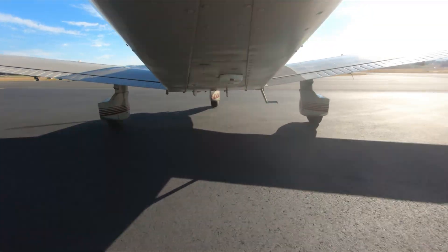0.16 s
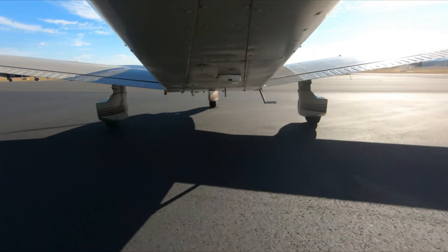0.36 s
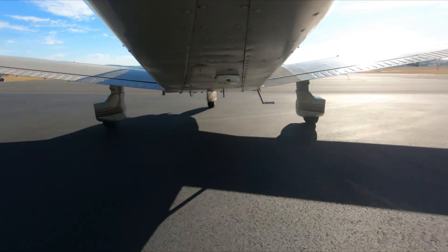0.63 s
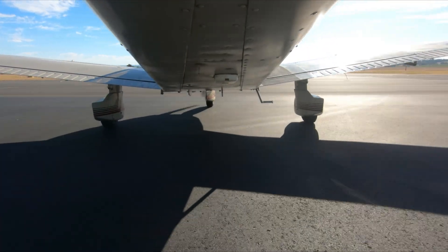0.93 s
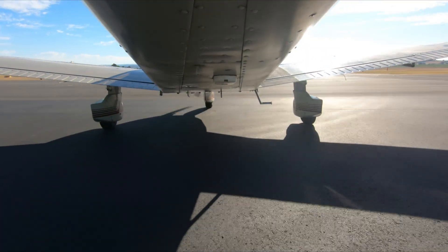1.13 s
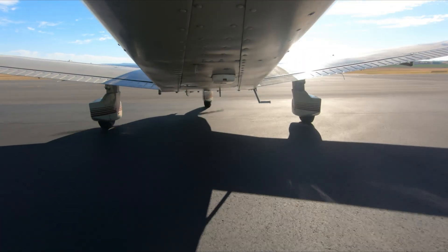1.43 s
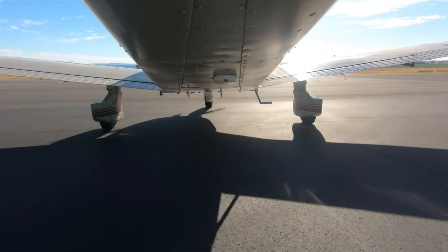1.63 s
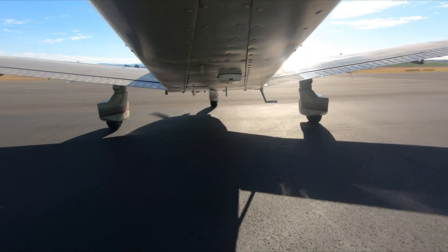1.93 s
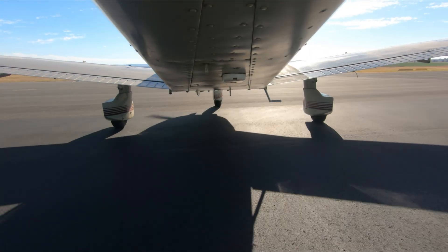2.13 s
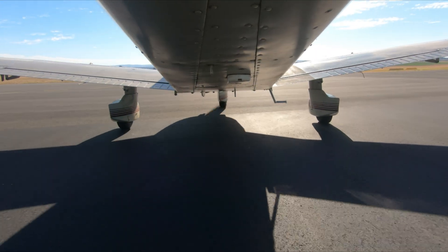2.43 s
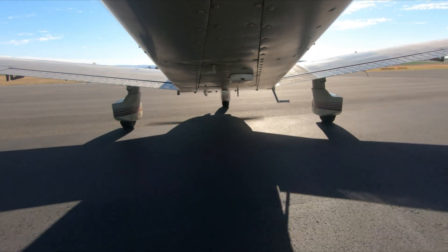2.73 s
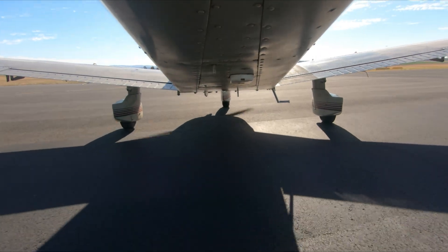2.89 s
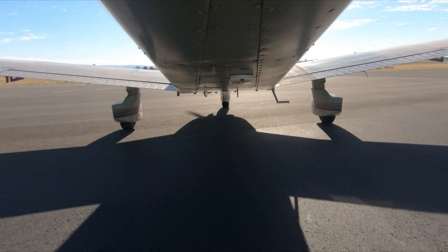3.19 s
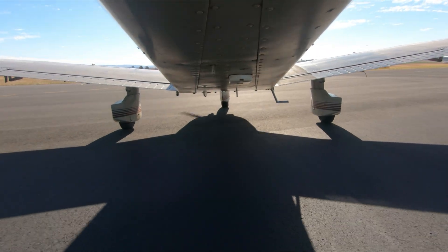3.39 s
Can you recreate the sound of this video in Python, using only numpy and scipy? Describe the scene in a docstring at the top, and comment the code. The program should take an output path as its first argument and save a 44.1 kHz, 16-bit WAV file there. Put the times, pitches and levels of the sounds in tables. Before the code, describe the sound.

A light propeller plane taxis with a low, fluttering engine drone, rumbling wash and faint hiss.

```python
"""A light aircraft taxis at low power, heard by a close pair of microphones under its tail.
From the start a four-cylinder engine and two-blade propeller drone: tones locked to the crankshaft,
a rasping noise puff per firing, valve ticks, a ring repeated each cycle, rumbling and hissing wash, thin whines.
Short noise bursts spit from the exhaust now and then; from the first second on, narrow hollow swells join them.
Exhaust, ring, shake and low wash grow while the firing tone weakens late; a limiter restrains the bass."""
import sys
import numpy as np
from scipy import signal
from scipy.fft import rfft, irfft
from scipy.io import wavfile
from scipy.ndimage import uniform_filter1d, minimum_filter1d

SR = 44100
rng = np.random.default_rng(int(sys.argv[2]) if len(sys.argv) > 2 else 0)


def to_wav(sig):
    """Store sig (one row per channel, or 1-D mono) as 16-bit WAV at the path in sys.argv[1].

    Samples outside -1..1 are clipped; the rate is SR.
    """
    pcm = np.clip(np.atleast_2d(sig), -1, 1) * 32767
    pcm = np.round(pcm).astype(np.int16)
    wavfile.write(sys.argv[1], SR, pcm.T)  # frames by channels


N = 156555

# Spectrum shape of the exhaust gas. Each row: frequency in Hz, relative density in dB per Hz.
EXHAUST_SPECTRUM = [(200, -28), (600, -4.5), (950, 3), (1350, 2.5), (1650, -2.5), (1900, -6.5), (2200, -17),
                    (3000, -18.5), (5000, -28.5), (7500, -29), (10000, -34.5), (15000, -59)]

START_TURN, JITTER_TURNS = -.22, 0.0032  # crankshaft position at the start, and its unsteadiness
DRONE_LAG_TURNS, SHAKE_LAG_TURNS = 0.3655, -0.022
WAVER_HZ, WAVER_DB, FIRING_WAVER_DB = 8.6, 0.52, 0.2
UNEVEN_HZ, UNEVEN_DB = 17, 0.94  # shared wavering of the overtones
OCTAVE_TRIM_DB = -0.12
SHAKE_DB, SHAKE_RISE_DB_PER_S, SHAKE_WAVER_DB = -47, 1.2, 1.5
RING_DB, RING_RISE_DB_PER_S = -54, 1.1
RING_TURN, RING_WIDTH_TURNS, RING_FLOOR = 0.29, 0.25, 0.6
RASP_DB, RASP_RISE_DB_PER_S = -52.5, 0.4
PUFF_TURNS, PUFF_SPREAD_DB = 0.12, 0.9
TICK_DB, TICK_TURNS = -72.5, 0.044
WASH_DB, HISS_DB, BUFFET_RISE_DB_PER_S = -42, -60, 0.5
WHINE_SPREAD_DB, WHINE_JITTER_CYCLES, WHINE_JITTER_HZ = 1, .09, 25
SPIT_RISE_S, SPIT_DECAY_S = 0.0011, 0.0073
SWELL_HZ, SWELL_WIDTH_HZ, SWELL_S = 913, 20, 0.044
FADE_S = .004
BASS_HZ, BASS_CEILING_DB, EDGE_HZ = 170, -28, 15700


def amp(db):
    """Decibels to gain."""
    return 10 ** (np.asarray(db) / 20)


def unit(x):
    """Scales to rms 1."""
    return x / np.sqrt(np.mean(x ** 2) + 1e-20)


def read(points, hz):
    """Reads a table on a log-frequency axis."""
    f, value = np.transpose(points)
    return np.interp(np.log(hz + 1), np.log(f + 1), value)


def bins():
    """Frequencies of a whole-length spectrum, in Hz."""
    return np.fft.rfftfreq(N, 1 / SR)


def colour(x, spectrum):
    """Filters by a spectrum shape, then scales to rms 1."""
    return unit(irfft(rfft(x) * amp(read(spectrum, bins())), N))


def bass(x):
    """The part of a sound below about BASS_HZ."""
    return irfft(rfft(x) / (1 + (bins() / BASS_HZ) ** 6), N)


def drift(rate_hz):
    """Random wandering of rms 1, mostly slower than rate_hz."""
    return unit(irfft(rfft(rng.standard_normal(N)) / (1 + (bins() / rate_hz) ** 4), N))


def air():
    """White noise at the two microphones, its likeness between them set at each frequency."""
    # Each row: frequency in Hz, left-right likeness from 0 to 1.
    likeness = [(100, 0.98), (300, 1), (600, 0.88), (1300, 0.95), (1900, 0.95), (2400, 0.96), (4500, 0.76),
                (7000, 0.87), (10000, 0.86), (12500, .5), (15000, 0.98)]
    a, b = rfft(rng.standard_normal((2, N)))
    shared = np.clip(read(likeness, bins()), 0, 1)
    right = shared * a + np.sqrt(1 - shared ** 2) * b
    return irfft(np.array([a, right]), N)


def control(index):
    """One column of the engine's run, interpolated to every sample."""
    # Each row: time in seconds, crankshaft turns per second, level of the firing tone in dB,
    # of its octave in dB before OCTAVE_TRIM_DB, of its double octave in dB.
    engine_run = [(0.0, 27.51, -35.5, -44.0, -53), (0.5, 27.58, -35.0, -42.2, -53),
                  (0.76, 27.55, -35.1, -42.4, -53.5), (1.01, 27.63, -35.7, -42.2, -56),
                  (1.52, 27.62, -35.9, -42.4, -51.5), (1.78, 27.69, -35.9, -43.0, -49.5),
                  (2.3, 27.59, -36.0, -44.4, -51.5), (2.55, 27.59, -36.4, -42.8, -54),
                  (2.79, 27.55, -37.4, -43.0, -52.5), (3.2, 27.59, -39.6, -40.6, -52),
                  (3.55, 27.61, -39.8, -44.0, -53.5)]
    rows = np.array(engine_run)
    return np.interp(np.arange(N) / SR, rows[:, 0], rows[:, index])


def bump(turns, place, width):
    """A smooth swell once in every two-turn engine cycle."""
    distance = (turns - place + 1) % 2 - 1
    return np.exp(-.5 * (distance / width) ** 2)


def drone(turns, from_middle_s):
    """Firings and blade passes push the air in step: firing tone, wavering overtones, growing once-a-turn shake."""
    # Weaker tones. Each row: multiple of the crankshaft rate, level in dB.
    weaker_tones = [(3, -49), (5.5, -62), (6, -62.5), (7, -67), (10, -56), (10.5, -73), (11, -67),
                    (12, -62), (13, -67), (14.5, -68), (16, -70.5)]
    angle = 2 * np.pi * (turns - DRONE_LAG_TURNS)
    firing_level = amp(control(index=2) + FIRING_WAVER_DB * drift(WAVER_HZ))
    firing = firing_level * np.sin(2 * angle)  # two firings a turn

    octaves = [(4, control(index=3) + OCTAVE_TRIM_DB), (8, control(index=4))]
    overtones = np.zeros(N)
    for multiple, db in octaves + list(weaker_tones):
        overtones += amp(db + WAVER_DB * drift(WAVER_HZ)) * np.sin(multiple * angle)
    unevenness = amp(UNEVEN_DB * drift(UNEVEN_HZ))

    shake_db = SHAKE_DB + SHAKE_RISE_DB_PER_S * from_middle_s + SHAKE_WAVER_DB * drift(WAVER_HZ)
    shake = amp(shake_db) * np.cos(2 * np.pi * (turns - SHAKE_LAG_TURNS))
    return np.sqrt(2) * (firing + unevenness * overtones + shake)  # levels are rms


def ring(turns, from_middle_s, count=180):
    """Pipe and airframe answer every cycle alike: harmonics of the cycle, strongest at one place in it."""
    # Each row: frequency in Hz, relative density in dB per Hz.
    ring_spectrum = [(100, -11), (170, -31), (330, 1.5), (600, 4.5), (950, -4), (1300, -2.5), (2000, -18),
                     (4000, -41)]
    phases = rng.random(count)
    pattern = np.zeros(N)
    for k, phase in enumerate(phases, 1):
        pattern += np.cos(np.pi * k * turns + 2 * np.pi * phase)
    strength = RING_FLOOR + bump(turns, RING_TURN, RING_WIDTH_TURNS)
    level = amp(RING_DB + RING_RISE_DB_PER_S * from_middle_s)
    return level * colour(pattern * strength, ring_spectrum)


def rasp(turns, from_middle_s):
    """Each cylinder lets out a puff of turbulent gas, its strength varying by chance from cycle to cycle."""
    # Each row: place in the two-turn cycle in turns, relative strength in dB.
    cylinders = [(.41, -3.5), (.90, 0), (1.40, -1.5), (1.92, -0.2)]
    gate = np.zeros(N)
    for place, db in cylinders:
        cycle = ((turns - place + 1) // 2).astype(int) + 2
        chance = rng.standard_normal(size=128)[cycle]
        gate += amp(db + PUFF_SPREAD_DB * chance) * bump(turns, place, PUFF_TURNS)
    level = amp(RASP_DB + RASP_RISE_DB_PER_S * from_middle_s)
    return level * colour(air() * gate, EXHAUST_SPECTRUM)


def valve_ticks(turns):
    """The valve gear ticks at the same places in every cycle, as short puffs of bright noise."""
    # Each row: place in the two-turn cycle in turns, relative strength in dB.
    tick_places = [(.15, 1), (.32, -0.5), (.64, 3), (.82, -1.5), (1.32, -2), (1.60, -4), (1.84, 4)]
    # Each row: frequency in Hz, relative density in dB per Hz.
    tick_spectrum = [(1000, -17), (2800, 1), (4500, -2.5), (7400, -5), (10000, -10), (12200, -16),
                     (15000, -28)]
    gate = sum(amp(db) * bump(turns, place, TICK_TURNS) for place, db in tick_places)
    return amp(TICK_DB) * colour(air() * gate, tick_spectrum)


def wash(from_middle_s, gust_db=0.9, flutter_db=1.0, swell_db=0.8):
    """Propeller wash rumbles along the belly in gusts, its bass growing, with a fluttering hiss."""
    # Each row of both: frequency in Hz, relative density in dB per Hz.
    rumble_spectrum = [(10, -5), (25, 4), (40, 2.5), (70, -3), (100, 2), (130, -1.5), (170, -6), (240, -11),
                       (330, -12), (450, -15.5), (750, -15), (950, -13.5), (1200, -21.5), (1700, -20.5),
                       (2300, -37.5), (5000, -69)]
    hiss_spectrum = [(500, 9), (1500, 2.5), (2300, 2), (2800, 1.5), (3400, -2), (4500, -3.5), (6300, -7.5),
                     (7400, -5), (9400, -12.5), (10200, -18), (12200, -17), (13500, -25), (15500, -33)]
    gusts = amp(gust_db * drift(rate_hz=7.7))
    rumble = amp(WASH_DB) * colour(air() * gusts, rumble_spectrum)
    buffet = amp(BUFFET_RISE_DB_PER_S * from_middle_s)
    rumble = rumble + bass(rumble) * (buffet - 1)  # only the bass grows
    flutter = amp(flutter_db * drift(rate_hz=180) + swell_db * drift(rate_hz=3.4))
    return rumble + amp(HISS_DB) * colour(air() * flutter, hiss_spectrum)


def whines():
    """Thin high sine tones with a slight quiver in pitch and level."""
    # Each row: centre frequency in Hz, peak level in dB, width of the wander in Hz.
    whine_tones = [(2654, -75.5, 2), (3779, -82.5, 2), (5285, -90, 30), (13295, -97.5, 40),
                   (14190, -99.5, 40), (15087, -105.5, 40)]
    out = np.zeros(N)
    for hz, db, width in whine_tones:
        cycles = np.cumsum(hz + width / 2 * drift(width)) / SR
        cycles += WHINE_JITTER_CYCLES * drift(WHINE_JITTER_HZ)
        out += amp(db + WHINE_SPREAD_DB * drift(width)) * np.sin(2 * np.pi * cycles)
    return out


def spits():
    """Now and then the exhaust lets out a sharper burst of gas: noise that starts fast and dies away."""
    # Each row: start in seconds, strength in dB.
    spit_times = [(.074, -58), (0.766, -48), (0.91, -43), (1.740, -44), (2.244, -48), (2.973, -47),
                  (3.338, -50), (3.422, -50)]
    gate = np.zeros(N)
    for start, db in spit_times:
        age = np.maximum(np.arange(N) / SR - start, 0)
        gate += amp(db) * np.minimum(age / SPIT_RISE_S, 1) * np.exp(-age / SPIT_DECAY_S)
    return gate * colour(air(), EXHAUST_SPECTRUM)


def swells():
    """A narrow resonance swells briefly out of the roar: noise in one thin band, raised and let fall."""
    # Each row: middle in seconds, level in dB.
    swell_times = [(.80, -57.5), (1.76, -58), (2.39, -56), (2.97, -53)]
    t = np.arange(N) / SR
    level = sum(amp(db) * np.exp(-.5 * ((t - middle) / SWELL_S) ** 2) for middle, db in swell_times)
    resonance = 1 / (1 + ((bins() - SWELL_HZ) / SWELL_WIDTH_HZ) ** 2)
    return level * unit(irfft(rfft(air()) * resonance, N))


def body():
    """Gain of the fixed resonances and hollows of the belly skin and microphone mount."""
    # Each row: frequency in Hz, width in Hz, gain in dB.
    resonances = [(560, 75, 0), (874, 7.7, -8), (894, 20, 2.5), (1071, 12, 3.5), (1360, 12, 3.5),
                  (1502, 10, 2), (1657, 35, -4), (1878, 18, 4.5), (2030, 33, 3.5), (2404, 33, 3.5),
                  (2630, 20, -3.5), (2660, 40, 3.5), (2840, 25, -6), (2980, 50, 3.5), (3420, 30, -2.5),
                  (3520, 50, 3.5), (3740, 27, -3), (3840, 70, 5.5), (4140, 36, 4.5), (4530, 41, 5),
                  (5110, 72, -6.5), (5500, 600, 3), (7300, 100, 2), (9500, 280, 2.5), (10640, 110, 4)]
    return amp(sum(db * np.exp(-.5 * ((bins() - hz) / width) ** 2) for hz, width, db in resonances))


def microphone_pair():
    """Splits a level and a phase difference evenly between the left and right microphones."""
    # Each row: frequency in Hz, left minus right in dB.
    lean = [(60, 1.0), (110, 1), (200, 2.0), (380, 1.5), (700, 2.5), (1290, 2), (2380, 0), (4400, 4),
            (8120, 0.5), (15000, -3.0)]
    # Each row: frequency in Hz, radians by which the left leads.
    lead = [(1000, 0.013), (1350, 0.12), (2150, 0.95), (2800, 0.73), (4200, 0.7), (5400, 0.011),
            (15000, .03)]
    side = np.array([[.5], [-.5]])
    return amp(side * read(lean, bins())) * np.exp(1j * side * read(lead, bins()))


def scene():
    """One crankshaft drives the engine's layers; all the sound reaches a close pair of microphones."""
    t = np.arange(N) / SR
    from_middle_s = t - t.mean()
    turns = START_TURN + np.cumsum(control(index=1)) / SR + JITTER_TURNS * drift(rate_hz=10.5)
    engine = drone(turns, from_middle_s) + ring(turns, from_middle_s) + rasp(turns, from_middle_s)
    engine = engine + valve_ticks(turns)
    mix = engine + wash(from_middle_s) + whines() + spits() + swells()
    fade = np.minimum(np.minimum(t, t[::-1]) / FADE_S, 1)  # both ends
    return irfft(rfft(fade * mix) * body() * microphone_pair(), N)


def record(dry):
    """A quick limiter holds down the peaks of the bass, alike on both sides; then the band limit."""
    low = bass(dry)
    allowed = np.minimum(1, amp(BASS_CEILING_DB) / (abs(low.mean(0)) + 1e-9))
    gain = uniform_filter1d(minimum_filter1d(allowed, size=900), size=900)  # sizes in samples
    limited = dry + (gain - 1) * low
    band = signal.firwin(511, EDGE_HZ, window=("kaiser", 9), fs=SR)
    return signal.oaconvolve(limited, band[None], "same")


dry = scene()
out = record(dry)
to_wav(out)
```